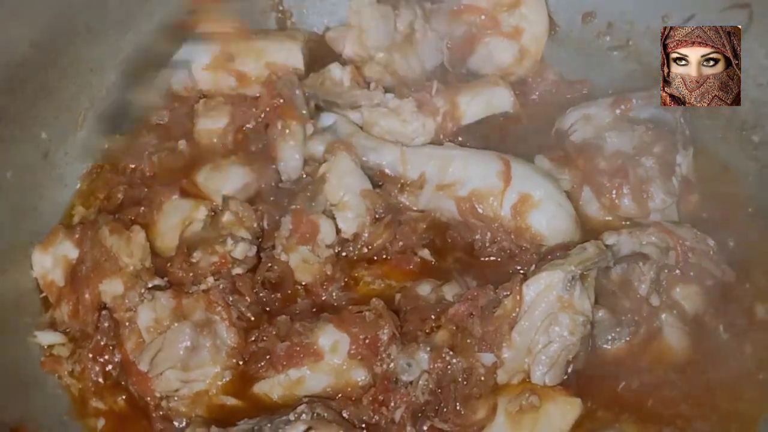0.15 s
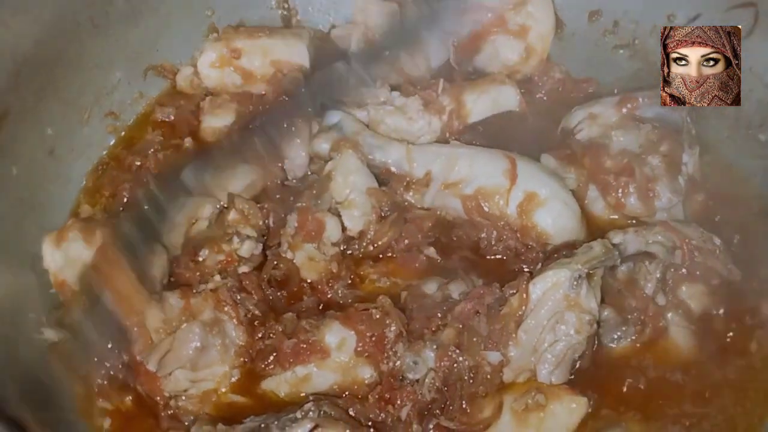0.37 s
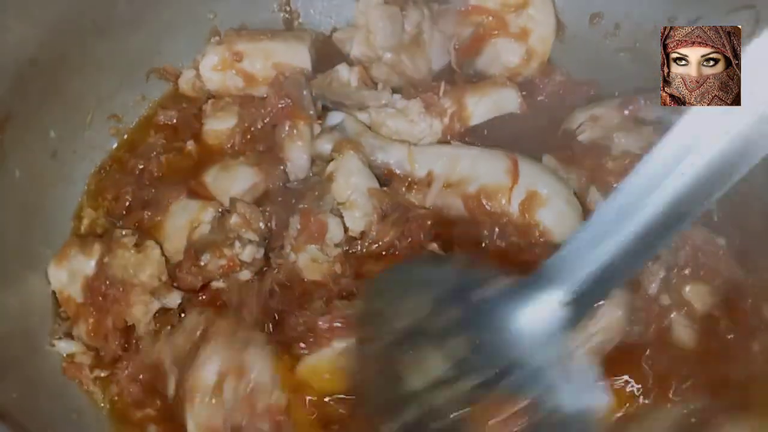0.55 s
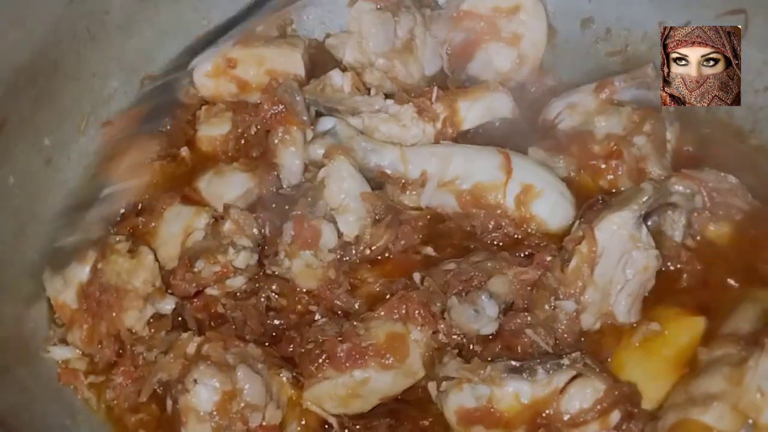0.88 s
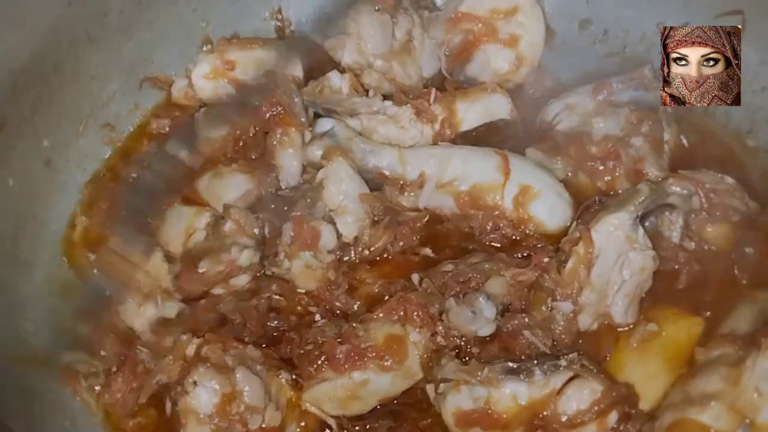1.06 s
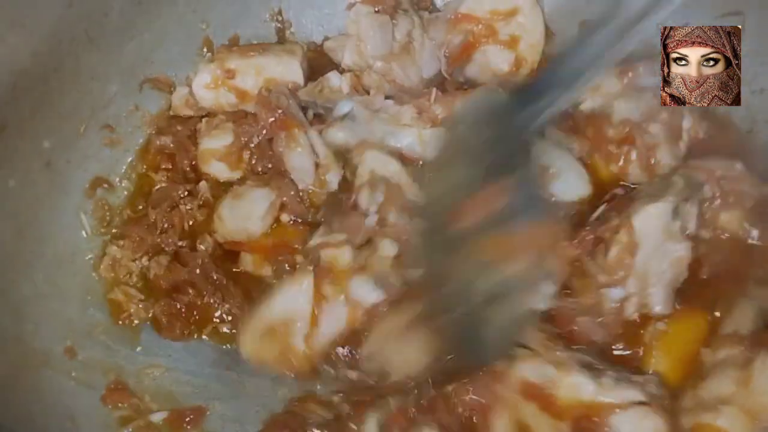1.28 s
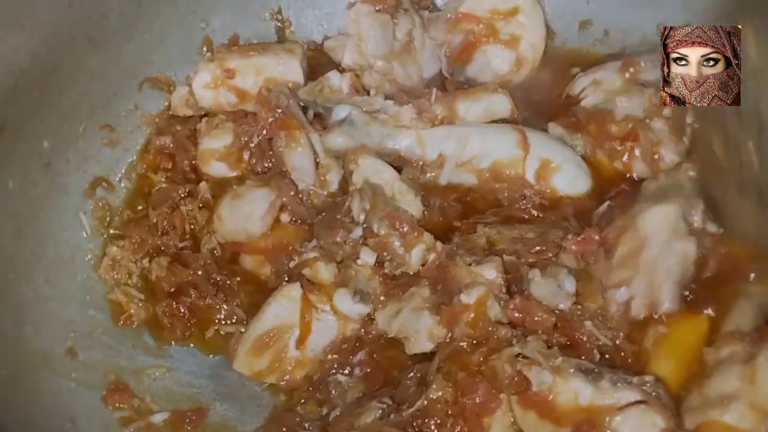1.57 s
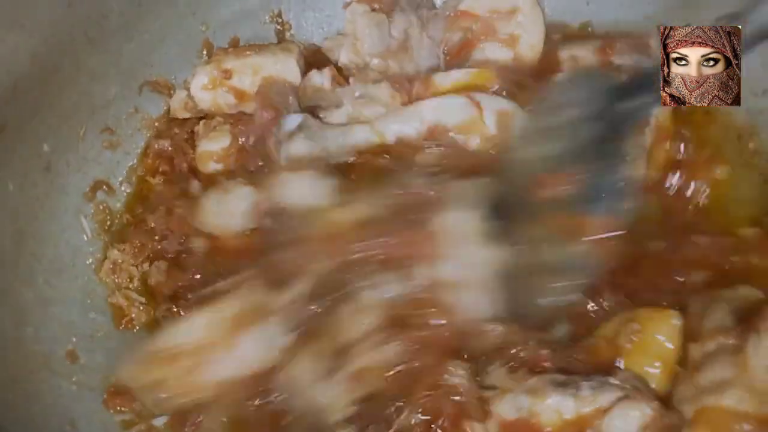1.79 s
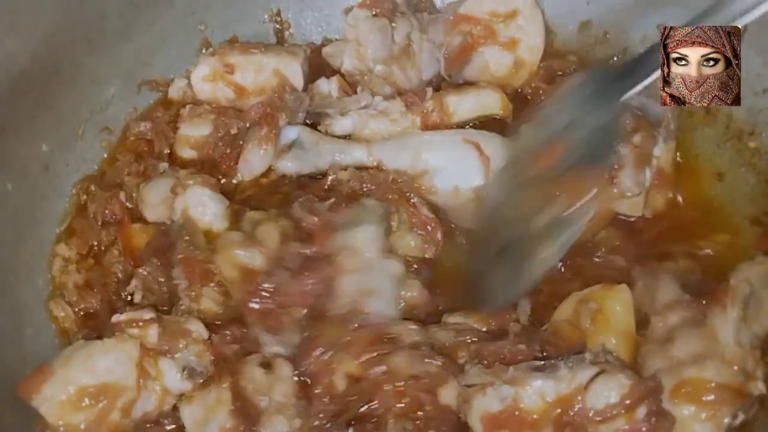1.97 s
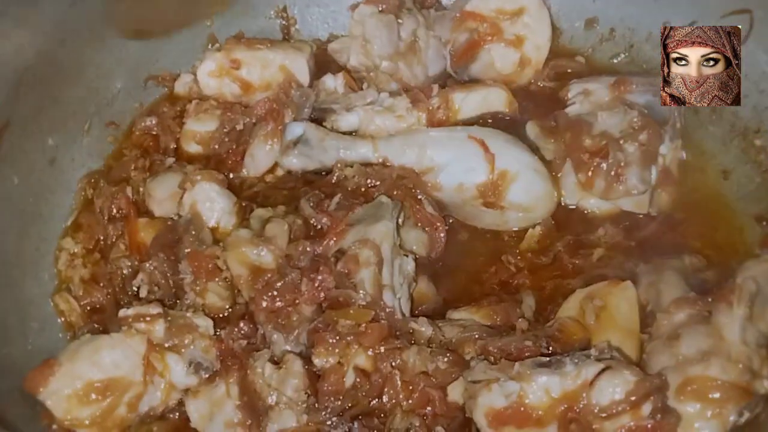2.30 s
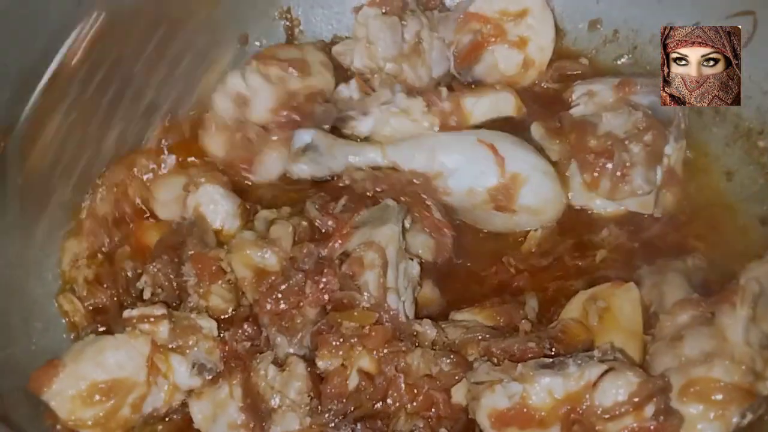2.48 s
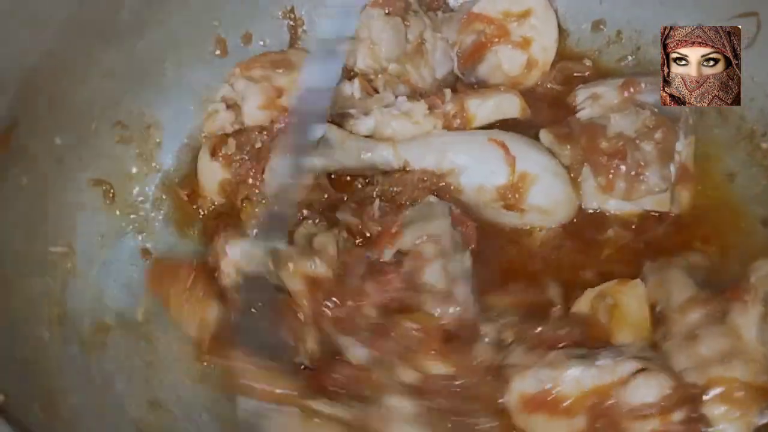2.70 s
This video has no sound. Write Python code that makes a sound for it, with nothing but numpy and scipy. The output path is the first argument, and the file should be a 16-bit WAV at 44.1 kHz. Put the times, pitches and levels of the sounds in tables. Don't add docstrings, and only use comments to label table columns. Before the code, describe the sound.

Close up in a small echoing kitchen, a steel spoon clanks and scrapes a pot, lumps of meat thud on its bottom, sauce bubbles quietly, hissing grows later, and a final knock and chattering scrape follow.

```python
import sys
import numpy as np
from scipy import signal
from scipy.fft import rfft, irfft, next_fast_len
from scipy.io import wavfile
from scipy.ndimage import uniform_filter1d, map_coordinates

SR = 44100
rng = np.random.default_rng(int(sys.argv[2]) if len(sys.argv) > 2 else 0)


def int16_out(signal):
    q = np.round(np.clip(np.atleast_2d(signal).T, -1, 1) * 32767)
    wavfile.write(sys.argv[1], SR, q.astype(np.int16))


def decibels_to_gain(level_db):
    exponent = np.asarray(level_db, float) / 20
    return 10 ** exponent


N = 125685

RIM, SIDE_WALL, FAR, BOTTOM, CORNER = range(5)

POT_HZ = [445, 512, 657, 698, 811, 825, 1095, 1165, 1628, 1652, 2019, 2221, 2405, 2780]
# t60/s, then level/dB when touched at rim, side, far wall, bottom, corner
POT_TONES = [(0.534, -19, -24, -28, -7.5, -19), (1.26, -27.5, -15, -44.5, -8.5, -31.5),
             (0.4, -16.5, -12.5, -14.5, -4, -16), (0.344, -16, -38, -29.5, -7.5, -14),
             (0.212, -13, -4.5, -5.5, -5.5, -3), (0.539, -1, -11, -12.5, -5, -10),
             (0.38, -26.5, -28.5, -16.5, -14, -18), (0.269, -10.5, -13, -15.5, -6, -16),
             (0.64, -3.5, -14, -24, -18.5, -27.5), (0.745, -6.5, -25.5, -2.5, -11.5, -16),
             (0.244, -13, -42.5, -29, -10, -39), (0.397, -12.5, -39, -18.5, -10, -24),
             (0.343, -15, -12, -18.5, -26.5, -30.5), (0.088, -5.5, -10, -34.5, -30, -8.5)]
SPOON_HZ = [2837, 3340, 3430, 3505, 3900, 4140, 4235, 4298, 4370, 4800, 6640, 7270, 7500, 7750]
# t60/s, then level/dB at the same five places
SPOON_TONES = [(0.275, -20, -6, -16, -11.5, -17.5), (0.153, -24.5, -6.5, -24, -11, -7.5),
               (0.35, -19, -12.5, -31.5, -6.5, -11), (0.305, -13, -15, -17, -3, -11.5),
               (0.26, -21.5, -29.5, -11, -14, -11.5), (.14, -24, -14, -7, -21, -22),
               (0.233, -9, -18, -6.5, 1, -19.5), (0.227, -14.5, -21, 0.5, -1, -6.5),
               (0.14, -27, -38, -17.5, -5, -15), (0.116, -42, -21, -5.5, -38, -25.5),
               (0.11, -13.5, -29.5, -24.5, -24, -26), (0.066, -7.5, -9.5, -22, -28.5, -23.5),
               (0.069, -15, -17, -17, -23.5, -31), (0.098, -24.5, -28, -20.5, -13, -32.5)]
# extra gain of the part that dies fast, its t60/s, rasp roll-off f/Hz
CONTACT = [(0.966, 0.103, 6440), (2.98, 0.0656, 7750), (0.24, 0.055, 25000), (3.6, 0.1154, 13100),
           (11.94, 0.1006, 9180)]
STILLED = {FAR: (2.45, .15), RIM: (.4, .4)}
# t/s, ring level/dB, crack level/dB, place
BLOWS = [(.033, -61, -30.5, BOTTOM), (.205, -17.5, -18, RIM), (0.491, -49, -38.5, BOTTOM),
         (.672, -68.5, -51, BOTTOM), (.942, -25, -25, SIDE_WALL), (.9455, -28, -30, SIDE_WALL),
         (1.232, -69.5, -50.5, SIDE_WALL), (1.575, -61, -54.5, CORNER), (1.586, -58, -42, BOTTOM),
         (2.346, -23.5, -17.5, FAR), (2.41, -30, -28.5, FAR)]
# f/Hz, level/dB
CRACK_COLOUR = [(120, -51), (250, -33.5), (880, -6), (1900, -14.5), (4200, -2), (7500, -8.5),
                (15600, -18.5)]
# t/s, level/dB
KNOCKS = [
    (.397, -24),
    (.405, -28),
    (.41, -30.5),
    (.425, -38),
]
SCRAPES = {BOTTOM: [(.285, 0.0737, 0.0733, -38.5, -22.5), (.35, 0.0272, 0.0218, -37.5, -23.5),
           (.4, 0.0436, 0.0657, -50, -43)], SIDE_WALL: [(1.615, 0.0334, 0.1949, -58, -34.5)],
           RIM: [(.205, 0.028, 0.41, -61, -29.5)], FAR: [(2.35, 0.0117, 0.46, -65, -36.5)],
           CORNER: [(2.445, 0.0198, 0.1013, -50, -36.5), (2.505, 0.0245, 0.05, -44, -28),
           (2.545, 0.0051, 0.0835, -53.5, -36)]}
# f/Hz, level/dB
RASP_COLOUR = [(150, -57.5), (300, -22), (800, -11), (2000, -13.5), (4300, -4), (8000, -7.5),
               (15600, -16.5)]
# t/s, rise/s, fall by 20 dB/s, level/dB, f/Hz
CHATTER = [(2.512, 0.008, 0.0833, -29.5, 3440), (2.535, 0.0104, 0.0863, -31, 3390),
           (2.525, 0.0081, 0.1444, -34, 1165), (2.57, 0.0166, 0.05, -36.5, 660),
           (2.348, 0.0049, 0.1054, -30.5, 985), (.3, 0.011, 0.0408, -27, 1628),
           (.335, .02, 0.0775, -24, 1640), (.31, 0.021, 0.0784, -26.5, 3800),
           (.345, 0.0263, 0.0545, -27.5, 3470), (.345, 0.0274, 0.169, -27, 2221),
           (.315, 0.0176, 0.0691, -23.5, 760), (.39, .012, 0.1079, -25.5, 720),
           (.36, 0.0119, 0.06, -22.5, 825), (.45, 0.0122, 0.1862, -30.5, 825),
           (.38, 0.022, 0.1535, -31, 1095), (.975, 0.022, 0.06, -38, 1645)]
# t/s, rise/s, fall by 20 dB/s, level/dB, f/Hz
PULSES = [
    (2.432, .012, .025, -28, 850),
    (2.453, .016, .016, -20.5, 813),
    (2.482, .01, .04, -28, 815),
    (2.51, .006, .02, -25, 800),
    (2.519, .016, .014, -17.5, 815),
    (2.547, .012, .022, -21.5, 810),
]
# t/s, level/dB
CLICKS = [
    (.397, -8),
    (.405, -12),
    (.41, -13),
    (.947, -13),
]

# t/s, level/dB, t60/s
THUDS = [(0.206, -34, 0.265), (0.339, -32, 0.41), (.394, -30.5, 0.204), (.48, -36.5, 0.108),
         (0.943, -32, 0.244), (1.059, -45.5, 0.122), (1.2, -52.5, 0.246), (1.429, -54.5, 0.099),
         (1.587, -45.5, 0.079), (1.656, -37.5, 0.076), (1.687, -50, 0.068), (1.746, -34.5, 0.224),
         (1.808, -52, 0.079), (2.199, -54.5, 0.123), (2.349, -44, 0.72), (2.531, -37, 0.1295)]
# f/Hz, level per Hz/dB
THUD_COLOUR = [(60, -52.5), (110, -23), (175, 3), (420, -5), (800, -11), (1500, -30), (3300, -120)]
# t/s, rise/s, fall by 20 dB/s, level/dB, f/Hz
BOOMS = [
    (.392, 0.0098, 0.13, -24.5, 200),
    (.395, 0.0115, 0.1308, -25, 376),
    (.4, .02, 0.1831, -26.5, 445),
    (0.937, 0.00515, 0.05, -32, 177),
    (1.053, 0.0139, 0.01, -39, 171.4),
    (1.755, 0.0045, 0.18, -34, 173.4),
    (1.76, 0.0133, 0.08, -37, 262),
    (1.747, 0.0039, .04, -37, 423),
    (1.744, 0.0036, 0.0748, -37, 830),
    (2.349, 0.0093, 0.1, -31.5, 306),
]

# t/s, level/dB
SIMMER = [(0, -48), (.2, -48.5), (.45, -44), (.7, -47.5), (.9, -55), (1.3, -49), (1.53, -52), (1.62, -44.5),
          (2, -54), (2.35, -54.5), (2.6, -48), (2.85, -51)]
# f/Hz, level per Hz/dB
SAUCE_COLOUR = [(30, -42), (70, -19), (110, -4), (250, -12.5), (800, -7), (3300, -9), (5500, -15),
                (15600, -38.5)]
# t/s, level/dB, f/Hz
POPS = [(1.166, -42.5, 3090), (1.29, -44, 1960), (1.33, -44, 2170), (1.356, -39, 3260),
        (1.392, -42.5, 2430), (1.434, -42.5, 3060), (1.464, -44.5, 996), (1.548, -43, 2140),
        (1.584, -35, 2650), (1.59, -27.5, 3670), (1.592, -34.5, 2900), (1.586, -38.5, 2270),
        (1.655, -36.5, 2210), (1.65, -43.5, 4170), (1.649, -33.5, 2750)]
# t/s, level/dB
SEAR = [(0, -59), (.2, -60.5), (.5, -59.5), (.78, -66), (1.2, -64), (1.55, -70), (1.64, -63), (1.8, -49.5),
        (2, -47), (2.33, -51.5), (2.6, -51.5), (2.85, -55.5)]
# f/Hz, level/dB
HISS_COLOUR = [(700, -38), (1500, -18.5), (2300, -2), (3700, -1.5), (7500, -3), (15700, -11.5)]
# t/s, level/dB
SPITS = [
    (.491, -37),
    (.672, -46),
    (.79, -54),
    (1.232, -50),
    (.187, -54),
]
# f/Hz, level per Hz/dB
SPIT_COLOUR = [(3000, -30.5), (8000, -6.5), (12000, 2), (15600, -2)]
# f/Hz, level per Hz/dB
MURMUR_COLOUR = [(40, -39), (100, -1.5), (250, -7), (800, -2), (1400, -5), (3000, -35.5)]

# f/Hz, t60/s
KITCHEN_T60 = [(200, 0.448), (2000, 0.339), (10000, 0.141)]
# f/Hz, level/dB
MICROPHONE = [(30, -5.5), (70, 0), (4600, 0), (5900, -6.5), (7550, 5.5), (9000, -2.5), (11200, -3.5),
              (13300, 2), (15700, -3)]


def unit(x):
    return x / np.sqrt(np.mean(x ** 2) + 1e-20)


def along(points, hz):
    f, v = np.transpose(points)
    return np.interp(np.log(hz + 1), np.log(f + 1), v)


def level(rows):
    s, db = np.transpose(rows)
    return decibels_to_gain(np.interp(np.arange(N) / SR, s, db))


def wobble(rate):
    knots = rng.standard_normal(int(N * rate / SR) + 4)
    return map_coordinates(knots, [np.arange(N) * rate / SR])


def coloured(x, spectrum):
    m = next_fast_len(N + 8192)
    gain = decibels_to_gain(along(spectrum, np.fft.rfftfreq(m, 1 / SR)))
    return unit(irfft(rfft(x, m) * gain, m)[:N])


def patchy(patchy_db):
    z = signal.stft(rng.standard_normal(N + 512), nperseg=512)[2]
    field = uniform_filter1d(rng.standard_normal(z.shape), size=6, axis=0)
    field = uniform_filter1d(field, size=8, axis=1)
    return signal.istft(z * decibels_to_gain(patchy_db * unit(field)), nperseg=512)[1][:N]


def catches():
    per_s, spread_db = 2500, 3
    hit = rng.random(N) < per_s / SR
    return unit(hit * rng.standard_normal(N) * decibels_to_gain(spread_db * rng.standard_normal(N)))


def burst(s, rise, fall):
    t = np.arange(N) / SR - s
    swell = np.sin(np.pi / 2 * np.clip(t / rise, 0, 1)) ** 2
    return swell * decibels_to_gain(-20 * np.clip(t - rise, 0, None) / fall)


def swells(rows, rough):
    t = np.arange(N) / SR
    out = np.zeros(N)
    for s, rise, fall, db, hz in rows:
        gain = decibels_to_gain(db + rough * 3 * wobble(60))
        phase = 2 * np.pi * hz * (t - s) + rough * 0.8 * wobble(60)
        out += gain * burst(s, rise, fall) * np.sin(phase)
    return out


def blips(s, db, hz, cycles):
    t = np.arange(700)[None] / SR
    u = t * hz[:, None] / cycles
    swell = np.e * 3 * u * np.exp(-3 * u)
    wave = decibels_to_gain(db)[:, None] * swell * np.sin(2 * np.pi * hz[:, None] * t * (1 + 0.0256 * u))
    at = (s * SR).astype(int)[:, None] + np.arange(700)
    return np.bincount(at.ravel(), wave.ravel(), N + 700)[:N]


def simmer():
    per_s, middle_hz, froth_db = 350, 2023.4, -5
    s = rng.random(1000) * 1000 / per_s
    pitch, size = rng.standard_normal(1000), rng.exponential(size=1000)
    keep = s < N / SR
    bubble_db = 2.8 * np.minimum(size[keep], 3)
    bubble_hz = middle_hz * np.exp(0.45 * pitch[keep])
    froth = unit(blips(s[keep], bubble_db, bubble_hz, cycles=10.68))
    sauce = coloured(patchy(patchy_db=2.5), SAUCE_COLOUR) + decibels_to_gain(froth_db) * froth
    at, db, hz = np.transpose(POPS)
    pops = blips(at - 0.003, db, hz, cycles=22.7)
    return decibels_to_gain(3 + 1.04 * wobble(8.386)) * level(SIMMER) * sauce + pops


def sear():
    hiss = coloured(patchy(patchy_db=2.0) + 0.44 * catches(), HISS_COLOUR)
    return decibels_to_gain(7 + 0.214 * wobble(35.11)) * level(SEAR) * hiss


def murmur():
    return decibels_to_gain(-57) * coloured(rng.standard_normal(N), MURMUR_COLOUR)


def ring(place):
    rise_s = 0.00329
    t = np.arange(SR) / SR
    tones = np.zeros(SR)
    for hz, tone in zip(POT_HZ + SPOON_HZ, POT_TONES + SPOON_TONES):
        tones += decibels_to_gain(tone[1 + place] - 60 * t / tone[0]) * np.sin(2 * np.pi * hz * t)
    extra, t60, _ = CONTACT[place]
    return tones * (1 - np.exp(-t / rise_s)) * (1 + extra * decibels_to_gain(-60 * t / t60))


def metal():
    crack_t60, knock_s = 0.047, 0.001174
    force, crack, rasp = np.zeros((5, N)), np.zeros(N), np.zeros(N)
    t = np.arange(N) / SR
    for s, ring_db, crack_db, place in BLOWS:
        force[place, round(s * SR)] = decibels_to_gain(ring_db)
        crack += decibels_to_gain(crack_db) * burst(s, 0.00198, crack_t60 / 3)
    for s, db in KNOCKS:
        push = np.clip(1 - np.abs(t - s) / knock_s * 2, 0, 1)
        force[BOTTOM] += decibels_to_gain(db) * push / (knock_s * SR / 2)
    grit = coloured(catches() + 2 * rng.standard_normal(N), RASP_COLOUR) * decibels_to_gain(1.3 * wobble(90))
    for place, rows in SCRAPES.items():
        dulled = signal.lfilter(*signal.butter(2, min(CONTACT[place][2], 20000), fs=SR), grit)
        for s, rise, fall, ring_db, rasp_db in rows:
            stroke = burst(s, rise, fall)
            force[place] += decibels_to_gain(ring_db - 24.0) * stroke * catches()
            rasp += decibels_to_gain(rasp_db) * stroke * dulled
    rings = np.zeros(N)
    for place in range(5):
        answer = signal.fftconvolve(force[place], ring(place))[:N]
        if place in STILLED:
            s, fall = STILLED[place]
            answer = answer * decibels_to_gain(-20 * np.clip(t - s, 0, None) / fall)
        rings += answer
    return rings + crack * coloured(rng.standard_normal(N), CRACK_COLOUR) + rasp


def spits():
    t60 = 0.04
    push = sum(decibels_to_gain(db) * burst(s, 0.0027, t60 / 3) for s, db in SPITS)
    return push * coloured(rng.standard_normal(N), SPIT_COLOUR)


def meat():
    push = sum(decibels_to_gain(db) * burst(s, 0.00612, t60 / 3) for s, db, t60 in THUDS)
    return push * decibels_to_gain(3.05 * wobble(70)) * coloured(rng.standard_normal(N), THUD_COLOUR)


def chatter():
    return swells(CHATTER, rough=1) + swells(PULSES, rough=0)


def booms():
    return swells(BOOMS, rough=1)


def clicks():
    length_s = 0.0005
    out = np.zeros(N)
    for s, db in CLICKS:
        v = (np.arange(N) / SR - s) / length_s * 2
        out += decibels_to_gain(db) * (1 - 2 * v * v) * np.exp(-v * v)
    return out


def kitchen(x):
    hz, t, z = signal.stft(rng.standard_normal(SR // 2 + SR // 4), SR, nperseg=256)
    fade = decibels_to_gain(-60 * t / along(KITCHEN_T60, hz)[:, None])
    tail = signal.istft(z * fade, SR, nperseg=256)[1]
    late = np.pad(x, (200, 0))
    return signal.fftconvolve(late, tail / np.linalg.norm(tail))[:N]


def scene():
    near = metal() + meat() + clicks()
    echo = decibels_to_gain(-7.5) * kitchen(near)
    frying = simmer() + sear() + spits() + murmur()
    return (near + echo + frying + chatter() + booms())[None]


def roll_off(x):
    return signal.sosfilt(signal.butter(12, 16480, fs=SR, output="sos"), x)


def record(dry):
    top_hz = 15750
    m = next_fast_len(N + 8192)
    hz = np.fft.rfftfreq(m, 1 / SR)
    gain = (hz < top_hz) * decibels_to_gain(along(MICROPHONE, hz))
    mix = irfft(rfft(dry, m) * gain, m)[:, :N]
    return roll_off(mix)


dry = scene()
out = record(dry)
int16_out(out)
```